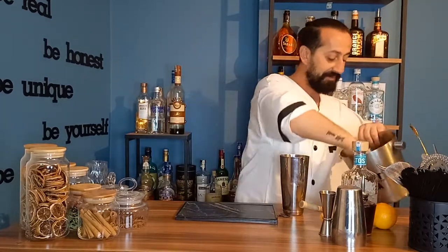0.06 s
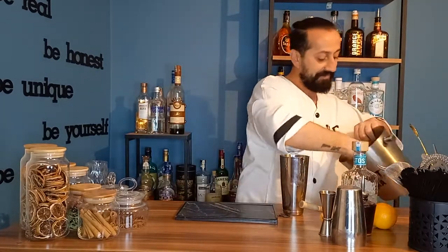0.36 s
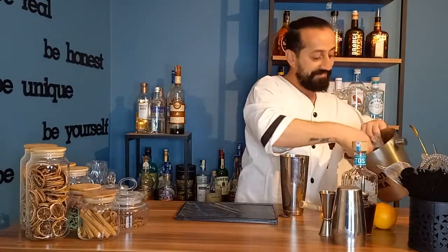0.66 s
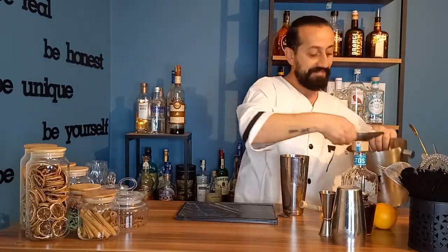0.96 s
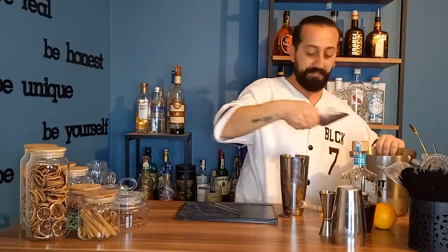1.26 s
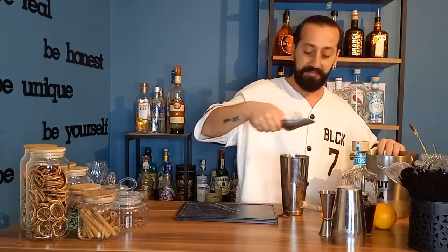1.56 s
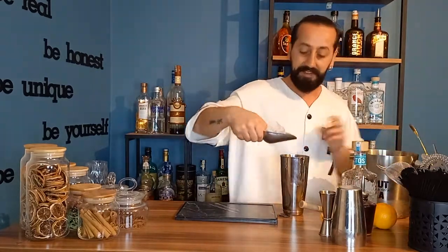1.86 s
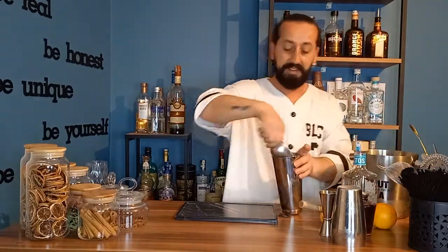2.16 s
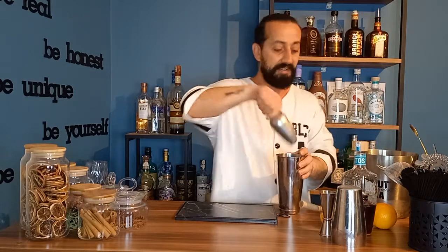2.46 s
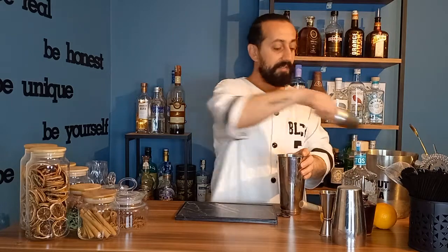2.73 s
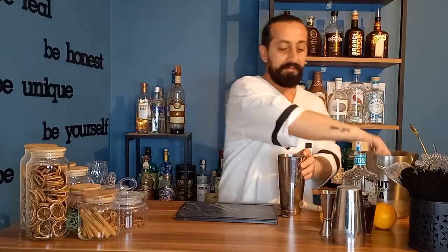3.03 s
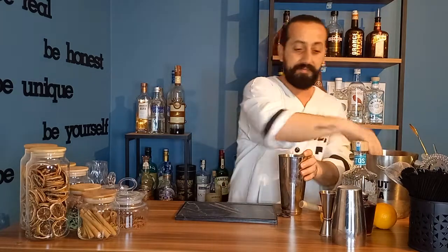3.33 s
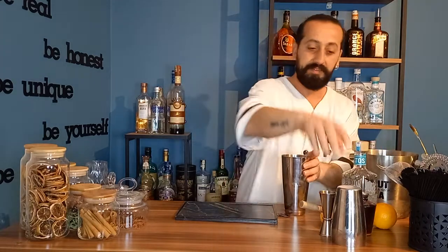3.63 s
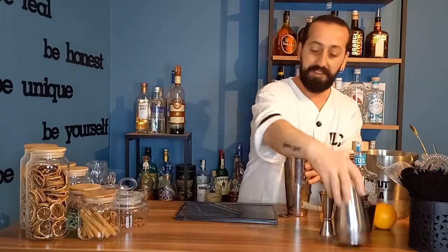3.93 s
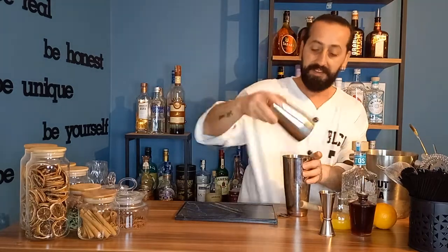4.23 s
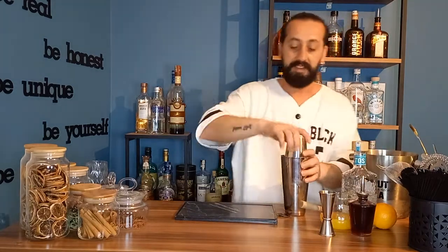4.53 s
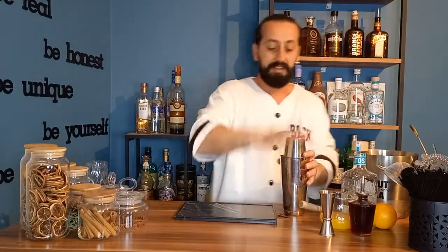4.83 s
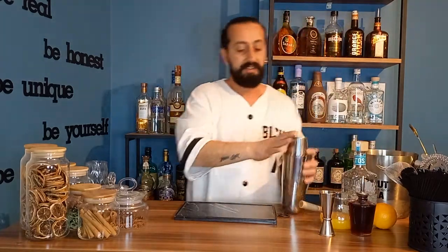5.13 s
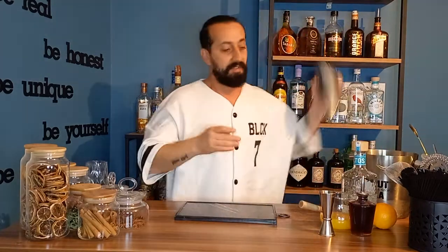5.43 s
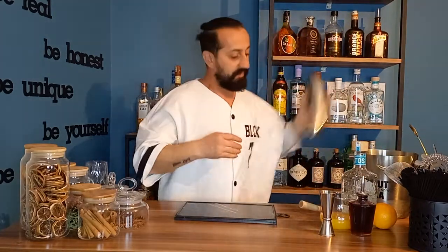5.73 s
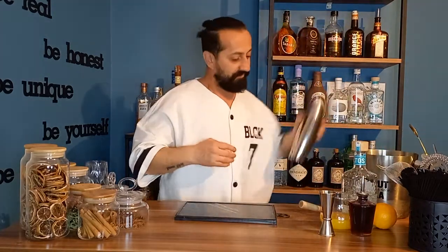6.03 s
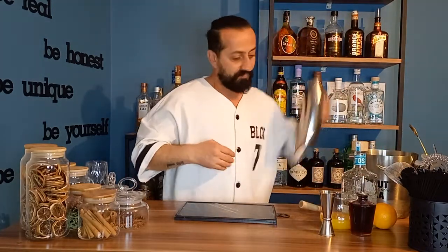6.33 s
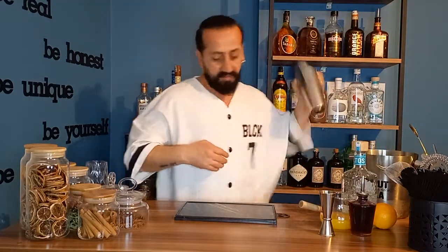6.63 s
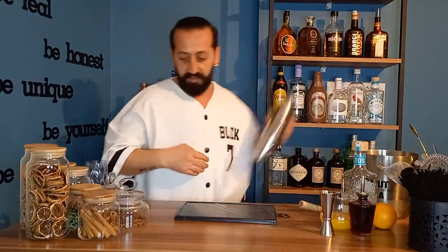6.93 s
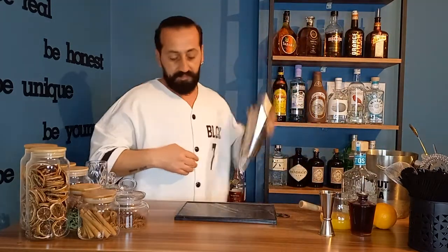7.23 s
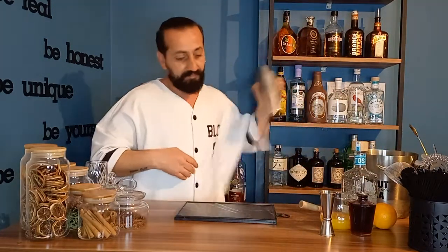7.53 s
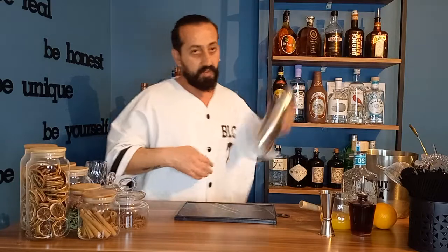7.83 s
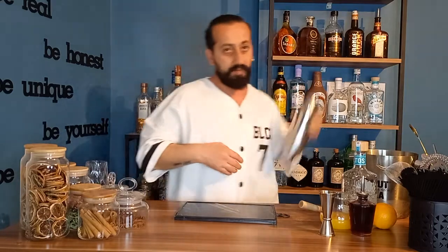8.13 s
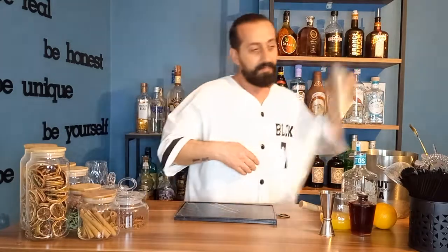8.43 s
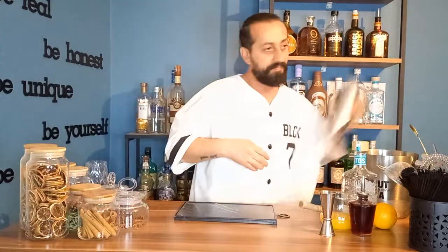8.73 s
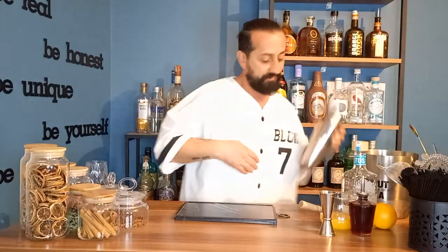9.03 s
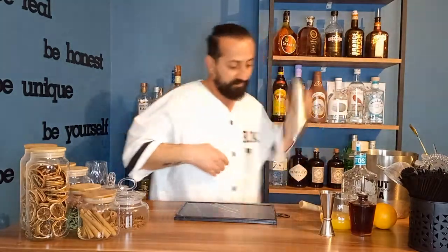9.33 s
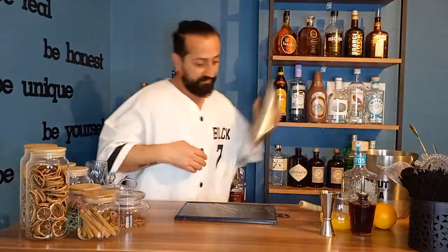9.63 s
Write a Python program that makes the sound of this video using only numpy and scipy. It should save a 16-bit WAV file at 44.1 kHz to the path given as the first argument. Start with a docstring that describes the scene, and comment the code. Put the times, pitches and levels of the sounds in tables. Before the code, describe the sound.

Ice is scooped from a clanging steel bucket, then rattles and sloshes in a fast-shaken cocktail shaker in a lively room.

```python
"""A cocktail shaker, shaken hard at about nine strokes a second: ice slams the steel and the drink sloshes.
First a scoop crunches ice out of a booming steel bucket, tips it into a tin and is dropped back with a
clang; a second tin is emptied in and slapped shut. Hails of tiny impacts ring the resonances of steel,
ice and wooden counter, and air pockets in the drink sing as rising tones.
The bar room is hard-walled and lively."""
import sys
import numpy as np
from scipy import signal
from scipy.fft import rfft, irfft, next_fast_len
from scipy.io import wavfile
from scipy.ndimage import uniform_filter1d

SR = 44100
rng = np.random.default_rng(int(sys.argv[2]) if len(sys.argv) > 2 else 0)


def waveform_to_disk(signal):
    """Save audio, clipped to [-1, 1], as 16-bit WAV at the path in sys.argv[1]."""
    frames = np.transpose(np.atleast_2d(signal))
    scaled = np.clip(frames, -1, 1) * 32767
    samples = np.round(scaled).astype(np.int16)
    wavfile.write(sys.argv[1], SR, samples)


N = 431298
TIME = np.arange(N) / SR
FFT_SIZE = 2 * next_fast_len(N // 2 + SR // 2)
FREQ = np.fft.rfftfreq(FFT_SIZE, 1 / SR)


def amp(db):
    """Decibels to gain."""
    return 10 ** (np.asarray(db) / 20)


def along(points, hz):
    """Read a curve of (freq_hz, value) points on a log frequency axis."""
    freqs, values = np.transpose(points)
    return np.interp(np.log(hz + 1), np.log(freqs + 1), values)


def fader(rows, column=1):
    """Ride the gain along one dB column, silent outside its time span."""
    rows = np.array(rows)
    return amp(np.interp(TIME, rows[:, 0], rows[:, column], left=-120, right=-120))


def blows(rows, column=1):
    """One clean impulse a row, sized by its dB column."""
    force = np.zeros(N)
    for row in rows:
        force[round(row[0] * SR)] = amp(row[column])
    return force


def bursts(rows, rise_s, fall_s, column=1):
    """Envelope of hits that swell up to their time and die after it; the dB column sets their energy."""
    power = np.zeros(N)
    for row in rows:
        centre = int(row[0] * SR)
        near = slice(max(0, centre - SR // 8), centre + SR // 4)
        t = TIME[near] - row[0]
        power[near] += (amp(row[column]) * np.exp(np.minimum(t / rise_s, -t / fall_s))) ** 2
    return np.sqrt(power * .08 / (rise_s + fall_s))


def swells(rows, attack_s, release_s, column=2, delay_s=0):
    """Envelope of (start_s, length_s, level_db) gestures that rise, hold and die away."""
    out = np.zeros(N)
    for row in rows:
        t = np.maximum(TIME - row[0] - delay_s, 0)
        release = np.exp(-np.maximum(t - row[1], 0) / release_s)
        out += amp(row[column]) * (1 - np.exp(-t / attack_s)) * release
    return out


def contacts(per_s, scatter_db):
    """A hail of tiny impacts of uneven size that share a steady flow of energy."""
    hail = (rng.random(N) < per_s / SR) * rng.choice([-1, 1], N)
    hail = hail * amp(scatter_db * np.clip(rng.standard_normal(N), -2, 2))
    return hail / np.sqrt(abs(uniform_filter1d(hail ** 2, size=SR // 80)) + 1e-9)


def pings(rows, t60_s, attack_s, glide=0):
    """One decaying tone for each (start_s, level_db, pitch_hz) row; glide bends it upward."""
    out, t = np.zeros(N + SR), np.arange(SR // 3) / SR
    for start_s, db, hz in rows:
        envelope = amp(db - 60 * t / t60_s) * (1 - np.exp(-t / attack_s))
        out[round(start_s * SR):][:len(t)] += envelope * np.sin(2 * np.pi * hz * t * (1 + glide * t))
    return out[:N]


def body(force, colour, modes=()):
    """Play a force through a broad tone colour and its resonances, at unit average power gain."""
    # minimum phase, so nothing rings ahead of the hit
    cepstrum = irfft(np.log(amp(along(colour, FREQ))))
    cepstrum[1:FFT_SIZE // 2] *= 2
    cepstrum[FFT_SIZE // 2 + 1:] = 0
    peaks = 1 + sum(amp(db) * 1j * FREQ * width / (hz * hz - FREQ ** 2 + 1j * FREQ * width)
                    for hz, width, db in modes)
    response = np.exp(rfft(cepstrum)) * peaks
    response /= np.sqrt(np.mean(abs(response) ** 2))
    return irfft(rfft(force, FFT_SIZE) * response)[:N]


# dark bed of room tone: freq_hz, level_db
ROOM_TONE_COLOUR = [(25, -4), (80, 3), (300, -0.5), (700, -4.5), (2000, -12.5), (6000, -12), (16000, -14.5)]


def room_tone():
    """A faint, steady hush, independent on each side."""
    return amp(-71.5) * np.array([body(rng.standard_normal(N), ROOM_TONE_COLOUR) for _ in range(2)])


# reverb time of the bar: freq_hz, t60_s
ROOM_DECAY = [(80, 0.56), (300, 0.36), (700, 0.31), (2000, 0.31), (5000, 0.29), (10000, 0.24),
              (16000, 0.21)]
# the tail is centred in the lows and wide in the highs: freq_hz, left_right_correlation
ROOM_CORRELATION = [(100, .95), (250, 0.94), (500, 0.76), (1000, 0.1), (2000, 0.22), (4000, 0.12),
                    (16000, 0.01)]


def bar_room(sound, direct_db, hold_s, tails_per_s):
    """Direct sound plus a diffuse tail off hard walls that keeps changing as the source moves."""
    hop = SR // tails_per_s
    hz, t, _ = signal.stft(np.zeros(SR // 2), SR, nperseg=256)
    spread = np.arccos(np.clip(along(ROOM_CORRELATION, hz), -1, 1)) / 2
    # wall echoes keep the level up for a moment before the decay sets in
    decay = amp(-60 * np.maximum(t - hold_s, 0) / along(ROOM_DECAY, hz)[:, None])
    shape = decay * np.array([np.cos(spread), np.sin(spread)])[:, :, None]
    padded, wet = np.pad(sound, (hop, 2 * hop)), np.zeros((2, N + 2 * SR))
    window = np.sin(np.pi * np.arange(2 * hop) / (2 * hop))
    for start in range(0, N + hop, hop):
        noise = rng.standard_normal(shape.shape) + 1j * rng.standard_normal(shape.shape)
        mid, side = signal.istft(noise * shape, nperseg=256)[1]
        tail = np.array([mid + side, mid - side]) / np.sqrt(np.sum(mid ** 2 + side ** 2))
        echoes = signal.fftconvolve((padded[start:start + 2 * hop] * window)[None], tail, axes=1)
        wet[:, start:start + echoes.shape[1]] += echoes
    direct = np.array([np.pad(sound, (3, 0))[:N], sound])  # reaches the right side first
    return (wet[:, hop:hop + N] + amp(direct_db) * direct) / np.hypot(1, amp(direct_db))


# dull knocks of bucket, scoop and tins that reach the counter: time_s, level_db
COUNTER_KNOCKS = [(1.068, -15), (1.389, -29.5), (2.087, -44.5), (2.178, -30), (2.263, -33.5),
                  (2.463, -29.5), (2.77, -53), (3.113, -31.5), (3.129, -31.5), (3.247, -32), (4.111, -57.5),
                  (4.207, -50.5), (4.36, -33), (4.397, -26), (4.542, -27.5), (4.859, -15.5)]
# the second tin scrapes off the counter and sings as it comes free: time_s, scrape_db, ring_db, pitch_hz
TIN_LIFT = [(3.918, -44.5, -62, 3340)]
# woody thud: freq_hz, level_db
COUNTER_COLOUR = [(25, -34), (50, -59.5), (80, -13), (110, -9), (160, -10.5), (210, -4), (260, -2),
                  (320, 1.5), (430, -1), (510, -10.5), (590, -6.5), (800, -19.5), (2000, -26), (8000, -47)]
# low notes of the counter: pitch_hz, width_hz, peak_db
COUNTER_RESONANCES = [(81.6, 4.9, 5), (346, 20, -25)]


def counter():
    """Heavy knocks thud through the wood, each with a quick, softer wall echo; a tin drags over it."""
    echo_s, echo_db = .029, -8
    echoes = [(s + echo_s, db + echo_db) for s, db in COUNTER_KNOCKS]
    thuds = amp(30) * (blows(COUNTER_KNOCKS) + blows(echoes))
    drag = bursts(TIN_LIFT, rise_s=.03, fall_s=.012) * contacts(1200, scatter_db=3)
    return body(thuds + drag, COUNTER_COLOUR, COUNTER_RESONANCES)


# the scoop pushes through the ice: start_s, length_s, crunch_db, boom_db
SCOOP_PUSHES = [(0, .29, -35, -33.5), (.34, .41, -36, -47), (.813, .05, -42.5, -43.5),
                (.935, 0.055, -41.5, -41.5)]
# cubes give way under the scoop: time_s, crunch_db, boom_db
ICE_SLIPS = [(.003, -29, -17), (.047, -40.5, -21.5), (.192, -30, -27.5), (.479, -34, -29.5),
             (.555, -33, -27.5), (.619, -42, -26.5), (.687, -26, -15), (.813, -29.5, -26),
             (.923, -43.5, -24), (.958, -27.5, -21.5), (.978, -33, -33.5)]
# hollow boom: freq_hz, level_db
FLOOR_COLOUR = [(40, -31.5), (150, -14), (250, 2), (400, 16.5), (520, 6), (900, -23), (3000, -75.5),
                (16000, -85)]
# notes of the bucket's floor: pitch_hz, width_hz, peak_db
FLOOR_RESONANCES = [(205.5, 11, 15), (382, 24, 13)]


def bucket_boom():
    """The shifting ice makes the bucket's floor boom."""
    pushes = amp(-5.5) * swells(SCOOP_PUSHES, attack_s=.02, release_s=.025, column=3)
    rumble = pushes * contacts(4300, scatter_db=3.5)
    bumps = amp(27.5) * blows(ICE_SLIPS, column=2)
    return body(rumble + bumps, FLOOR_COLOUR, FLOOR_RESONANCES)


# single cubes clink on the bucket's wall: start_s, level_db, pitch_hz
BUCKET_CLINKS = [(.272, -35.5, 2010), (.556, -25, 2004), (.64, -37, 1080), (.83, -33, 1490)]
# gritty midrange crunch: freq_hz, level_db
CRUNCH_COLOUR = [(40, -29), (200, -7), (700, -0.5), (1600, 4), (2500, -1), (4000, -3.5), (7000, -8),
                 (12000, -7), (16000, -17)]
# notes of the bucket's wall: pitch_hz, width_hz, peak_db
WALL_RESONANCES = [(1550, 21, -3.5), (1690, 35, -15.5), (2000, 34, 10.5), (3280, 27, -1)]


def scoop_crunch():
    """Cubes scrape, clink and give way in front of the scoop."""
    pushes = swells(SCOOP_PUSHES, attack_s=.008, release_s=.03)
    slips = bursts(ICE_SLIPS, rise_s=.0023, fall_s=.0035)
    grit = amp(-3.5) * (pushes + slips) * contacts(700, scatter_db=10)
    clinks = amp(8) * pings(BUCKET_CLINKS, t60_s=.05, attack_s=.00037)
    return body(grit, CRUNCH_COLOUR, WALL_RESONANCES) + clinks


# ice or steel strikes the open tin: time_s, steel_db, crackle_db
OPEN_TIN_HITS = [(2.178, -29, -40), (2.459, -49.5, -60), (2.51, -65, -54.5), (3.113, -43, -51),
                 (3.245, -56.5, -51.5), (4.36, -36, -41), (4.394, -28.5, -37.5), (4.537, -23.5, -37.5)]
# a load of ice slides into the tin: start_s, length_s, steel_db, crackle_db
ICE_POURS = [(2.218, .085, -32.5, -32), (4.385, 0.083, -46.5, -36.5)]
# ice settles and steel is handled, with a faint metallic rustle: start_s, length_s, level_db
SOFT_RUSTLES = [(1.13, 0.23, -47.5), (1.37, 0.034, -43), (1.885, 0.018, -70), (2.05, .12, -60.5),
                (2.45, 0.18, -64.5), (2.85, .2, -67), (3.89, 0.018, -57.5), (4.2, .06, -82)]
# bright clank of the open tin: freq_hz, level_db
OPEN_TIN_COLOUR = [(60, -43), (200, -14), (900, -6.5), (1400, -0.5), (2000, -0.5), (2700, -4), (3500, -4),
                   (4500, -11), (7000, -16.5), (16000, -17.5)]
# notes of the open tin: pitch_hz, width_hz, peak_db
OPEN_TIN_RESONANCES = [(742, 35, 9.9), (1230, 24, 7.9), (1480, 32, 3), (1800, 51, 5.9), (1943, 37, 11),
                       (3410, 37, 3.7), (4830, 81, 8)]


def open_tin():
    """Cubes drop into the open tin; steel rustles faintly in between and sings when lifted."""
    hits = amp(-4.5) * bursts(OPEN_TIN_HITS, rise_s=.00049, fall_s=.0026)
    landing = hits * contacts(3000, scatter_db=16)
    pours = swells(ICE_POURS, attack_s=.008, release_s=.013, delay_s=.023)  # the fall from lip to bottom
    piling = pours * contacts(400, scatter_db=20.5)
    rustle = swells(SOFT_RUSTLES, attack_s=.02, release_s=.04) * contacts(500, scatter_db=3.5)
    lift_ring = pings([(s, db, hz) for s, _, db, hz in TIN_LIFT], t60_s=.44, attack_s=.0089)
    return body(landing + piling + rustle, OPEN_TIN_COLOUR, OPEN_TIN_RESONANCES) + lift_ring


DROP_S = 3.269
# full-range clang of scoop on bucket: freq_hz, level_db
CLANG_COLOUR = [(50, -23.5), (200, 1.5), (450, 4), (720, -3.5), (1000, -10), (1500, -7.5), (3000, -5.5),
                (4200, -10.5), (5500, -5.5), (8000, -3.5), (12000, -4), (16000, -10)]
# metallic notes of the clang: pitch_hz, width_hz, peak_db
CLANG_RESONANCES = [(387, 21, 12), (444, 8.4, 12), (576, 60, 9.4), (804, 8, 21), (1135, 34, 13),
                    (1390, 26, 17), (1437, 14, 22), (1820, 6.2, 24), (2000, 50, 8), (2220, 12, 11),
                    (3000, 10, 12), (3440, 27, 9), (5319, 29, 4.5), (6560, 23, 5.3), (7600, 23, 7.4)]


def dropped_scoop():
    """The scoop bounces to rest in the bucket, ever sooner and softer."""
    bounce = np.arange(14)
    flights_s = .028 * .93 ** bounce
    hits = np.column_stack([DROP_S + np.cumsum(flights_s) - flights_s, -25 - 2.08 * bounce])
    clatter = amp(4.5) * bursts(hits, rise_s=.00067, fall_s=.011) * contacts(4000, scatter_db=2)
    return body(clatter, CLANG_COLOUR, CLANG_RESONANCES)


# the bucket's ring-out: pitch_hz, level_db, t60_s
BUCKET_PARTIALS = [(590, -44.5, 0.78), (802, -27.5, 0.89), (1240, -42, 0.61), (1450, -36.5, .43),
                   (1770, -35.5, 0.7), (2250, -39, .5), (3030, -36, .45)]


def bucket_ring():
    """The bucket rings on after the clang, each partial dying at its own rate."""
    t = np.maximum(TIME - DROP_S, 0)
    return sum(amp(db - 60 * t / t60) * np.sin(2 * np.pi * hz * t) for hz, db, t60 in BUCKET_PARTIALS)


# hits on hand-held steel; the second last is the palm jamming the tins together, the last its quick echo off
# the wall: time_s, level_db
HELD_HITS = [(1.068, -51), (1.388, -37), (2.459, -51.5), (4.537, -34), (4.86, -19), (4.885, -30)]
# palm-muted steel: freq_hz, level_db
MUTED_COLOUR = [(100, -37), (500, -10), (750, -5), (1000, -10), (1350, -11.5), (1850, -2), (2200, -2.5),
                (2500, -4), (3200, -19.5), (4600, -20.5), (6700, -29.5), (16000, -33.5)]


def held_steel():
    """Steel damped by the hand gives a short, dry clack."""
    hits = amp(1.5) * bursts(HELD_HITS, rise_s=.0013, fall_s=.0023)
    return body(hits * contacts(7500, scatter_db=2.5), MUTED_COLOUR)


# the arm's pace and effort, with a whole number of shakes between rows:
# start_s, return_delay_s, steel_db, slosh_db, crackle_db
ARM_PACE = [(5.467, 0.12, -20, -27.5, -27.5), (6, 0.1, -21.5, -25, -31), (6.915, 0.098, -19, -30, -31.5),
            (7.376, .095, -21.5, -27, -31.5), (7.817, .11, -20.5, -29.5, -32.5),
            (8.038, 0.11, -19.5, -25, -31), (8.502, .108, -19.5, -26.5, -33.5),
            (9.185, .1, -22, -27.5, -30), (9.644, 0.1, -20, -27.5, -34)]
SHAKING = TIME > ARM_PACE[0][0]
NOMINAL_SHAKE_S, STROKE_SCATTER_DB = .228, 1.4
RETURN_DB = (-1, 0, -.6)  # return stroke against the outward one: steel, slosh, crackle


def arm_strokes():
    """Each shake throws the load at one end, then the other: time_s, steel_db, slosh_db, crackle_db."""
    pace = np.array(ARM_PACE)
    runs = [np.linspace(first, last, round((last[0] - first[0]) / NOMINAL_SHAKE_S), endpoint=False)
            for first, last in zip(pace, pace[1:])]
    shakes = np.vstack(runs + [pace[-1:]])
    times = np.concatenate([shakes[:, 0], shakes[:, 0] + shakes[:, 1]])
    db = np.vstack([shakes[:, 2:], shakes[:, 2:] + RETURN_DB])
    return np.column_stack([times, db + STROKE_SCATTER_DB * rng.standard_normal(db.shape)])


# the ice starts to slide as the shaker is raised and tipped: time_s, steel_db, crackle_db
ICE_TUMBLE = [(5.12, -68.5, -63.5), (5.32, -58, -56.5), (5.35, -45, -41.5), (5.405, -61, -74),
              (5.425, -39.5, -33.5), (5.46, -15.5, -26.5), (5.52, -49, -54.5)]
# glassy top end of the ice: freq_hz, level_db
CRACKLE_COLOUR = [(100, -48), (1500, -8), (3500, 1.5), (5500, 2), (6800, -2.5), (8500, 2.5), (11000, -0.5),
                  (13000, 3), (16000, -7)]
# faint high notes of the rim: pitch_hz, width_hz, peak_db
RIM_RESONANCES = [(5100, 200, -8), (6090, 80, -5), (13055, 110, -9)]


def ice_crackle(strokes):
    """Cubes grind against each other as they slide, and chip as they land."""
    landing = amp(3) * bursts(OPEN_TIN_HITS, rise_s=.0006, fall_s=.0082, column=2)
    pouring = swells(ICE_POURS, attack_s=.01, release_s=.04, column=3)
    run_up = bursts(strokes, rise_s=.022, fall_s=.002, column=3)
    crash = bursts(strokes, rise_s=.0035, fall_s=.014, column=3)
    loose_cubes = fader(ICE_TUMBLE, column=2) + amp(-44) * SHAKING
    envelope = landing + pouring + np.hypot(run_up, crash) + loose_cubes
    return body(envelope * contacts(3000, scatter_db=2), CRACKLE_COLOUR, RIM_RESONANCES)


# large air pockets gulp in the drink: start_s, level_db, pitch_hz
AIR_POCKETS = [(8.159, -21, 600), (8.484, -25, 1004), (8.703, -14.5, 1077), (8.93, -21.5, 950),
               (8.968, -32, 840)]
# wet midrange slosh: freq_hz, level_db
SLOSH_COLOUR = [(25, -53.5), (50, -32), (80, -17), (160, -16), (220, -7.5), (400, -1.5), (600, 3.5),
                (1100, 2.5), (1600, 3.5), (3000, -16), (16000, -61)]


def drink_slosh(strokes):
    """The liquid washes along and slaps each end; trapped air rings with a rising pitch."""
    wash = amp(-9.5) * bursts(strokes, rise_s=.0116, fall_s=.0041, column=2)
    slaps = amp(-.5) * bursts(strokes, rise_s=.0027, fall_s=.0073, column=2)
    gulps = amp(6.5) * pings(AIR_POCKETS, t60_s=.044, attack_s=.00078, glide=2.4)
    return body(np.hypot(wash, slaps) * contacts(1500, scatter_db=4), SLOSH_COLOUR) + gulps


# a whole cube hits the steel squarely and picks out one note of the wall: time_s, level_db, pitch_hz
CUBE_CLACKS = [(5.467, -31.5, 1960), (5.847, -23, 3510), (6.215, -21, 1900), (6.563, -20.5, 1990),
               (6.788, -25.5, 2080), (7.008, -22.5, 1860), (7.351, -14.5, 1970), (7.378, -18.5, 2020),
               (7.602, -28, 2050), (8.033, -19.5, 2080), (8.267, -16, 2024), (8.632, -24.5, 3580),
               (8.829, -35.5, 3566), (9.179, -25, 1970), (9.294, -20, 3590), (9.398, -23, 1910),
               (9.511, -20.5, 2100)]
# hard rattle of the closed shaker: freq_hz, level_db
SHAKER_COLOUR = [(60, -48.5), (200, -11), (700, -4.5), (1400, -10), (2000, -3.5), (2700, -3), (3500, -7.5),
                 (4500, -7), (7000, -7), (16000, -14)]
# notes of the closed shaker: pitch_hz, width_hz, peak_db
SHAKER_RESONANCES = [(820, 37, -2), (1297, 53, 14), (1663, 140, 9.5), (1752, 12, 19.5), (1956, 120, 14),
                     (2032, 230, 11), (3140, 360, 12), (3345, 14, 7.5)]


def shaker_steel(strokes):
    """Ice in the closed shaker gathers speed along the wall and slams into each end."""
    run_up = amp(-12.5) * bursts(strokes, rise_s=.039, fall_s=.0036)
    loose_cubes = fader(ICE_TUMBLE) + amp(-35) * SHAKING  # the rattle carries on between strokes
    sliding = (loose_cubes + run_up) * contacts(500, scatter_db=9)
    slams = amp(-2.5) * bursts(strokes, rise_s=.0021, fall_s=.009) * contacts(700, scatter_db=12.5)
    # each stroke also throws one lighter cube at a random spot of the wall
    late, size, pitch = rng.standard_normal((len(strokes), 3)).T
    strays = np.column_stack([strokes[:, 0] + .01 * late, -29 + 2 * size, 2310 * 2 ** (.35 * pitch)])
    cubes = np.vstack([CUBE_CLACKS, strays])
    clacks = amp(-10) * bursts(cubes, rise_s=.00041, fall_s=.0009) * contacts(12000, scatter_db=9)
    wall_notes = amp(10.5) * pings(cubes, t60_s=.031, attack_s=.00038)
    return body(sliding + slams + clacks, SHAKER_COLOUR, SHAKER_RESONANCES) + wall_notes


def scene():
    """All the work at the counter, heard mostly by way of the walls and leaning slightly right."""
    clang = dropped_scoop()
    strokes = arm_strokes()
    resting = bucket_boom() + counter() + open_tin() + clang + held_steel()
    resting = bar_room(resting, direct_db=-12.5, hold_s=.0092, tails_per_s=6)
    moving = scoop_crunch() + shaker_steel(strokes) + ice_crackle(strokes) + drink_slosh(strokes)
    moving = bar_room(moving, direct_db=-5.5, hold_s=.02, tails_per_s=20)
    balance = amp([[-.4], [.4]])
    return (resting + moving + bucket_ring()) * balance + room_tone()


def record(dry):
    """A brick-wall low-pass trims the very top."""
    cutoff_hz = 16100
    return irfft(rfft(dry, FFT_SIZE) * (FREQ < cutoff_hz))[:, :N]


dry = scene()
out = record(dry)
waveform_to_disk(out)
```